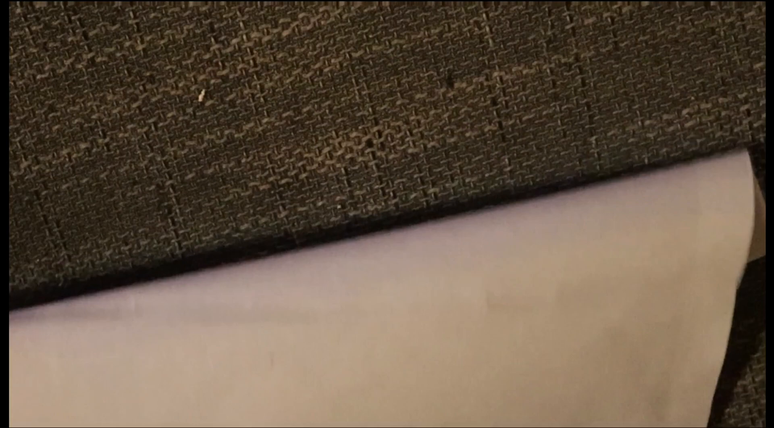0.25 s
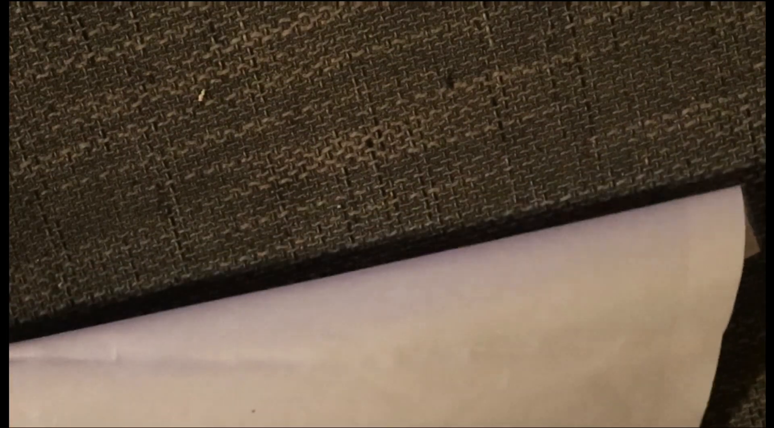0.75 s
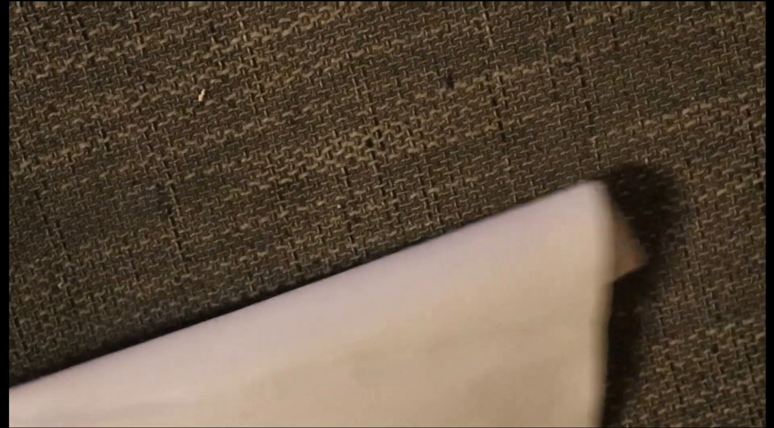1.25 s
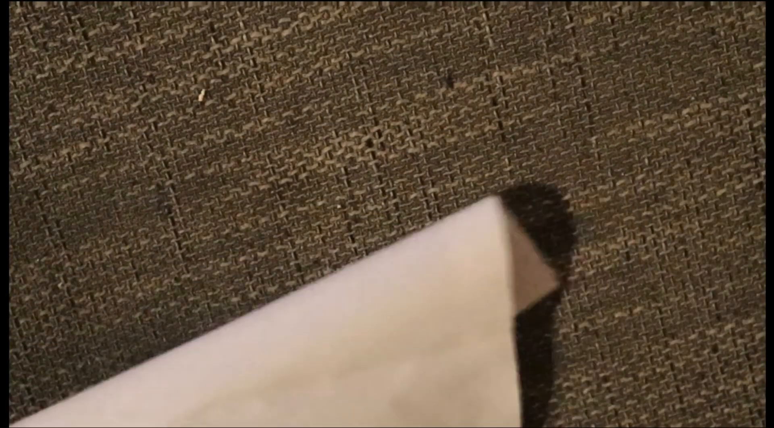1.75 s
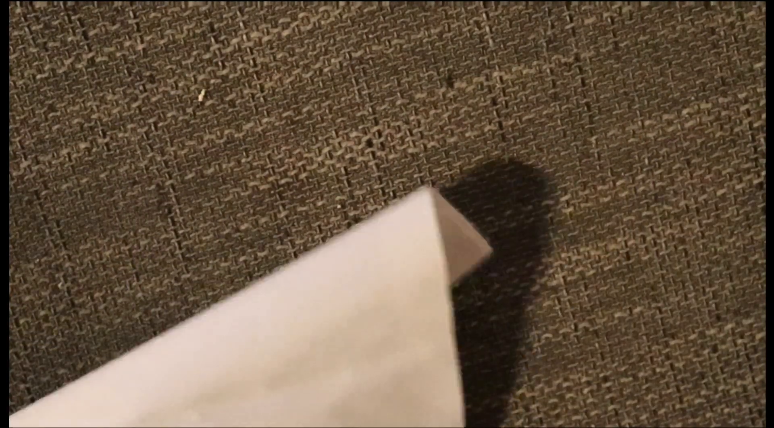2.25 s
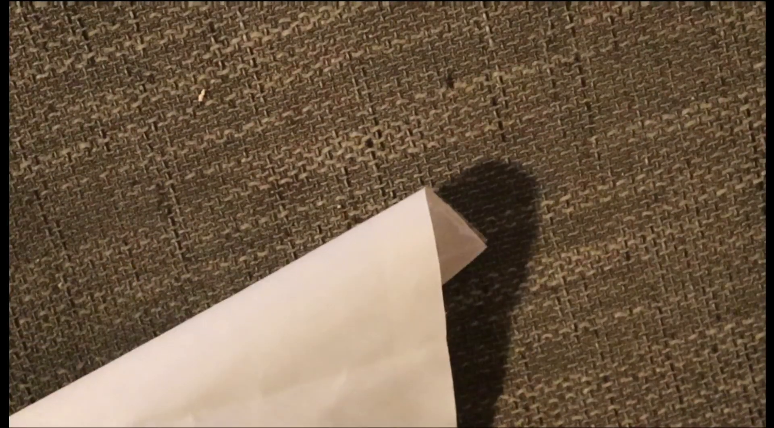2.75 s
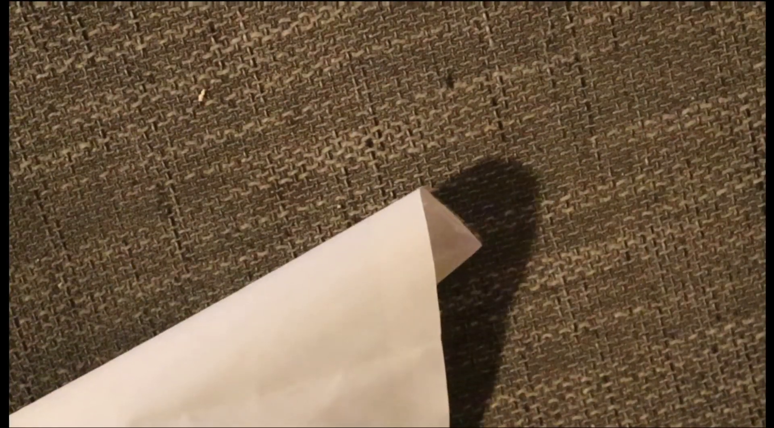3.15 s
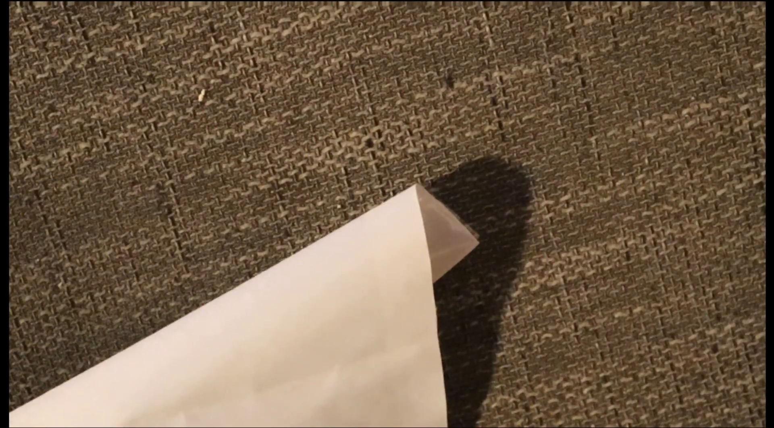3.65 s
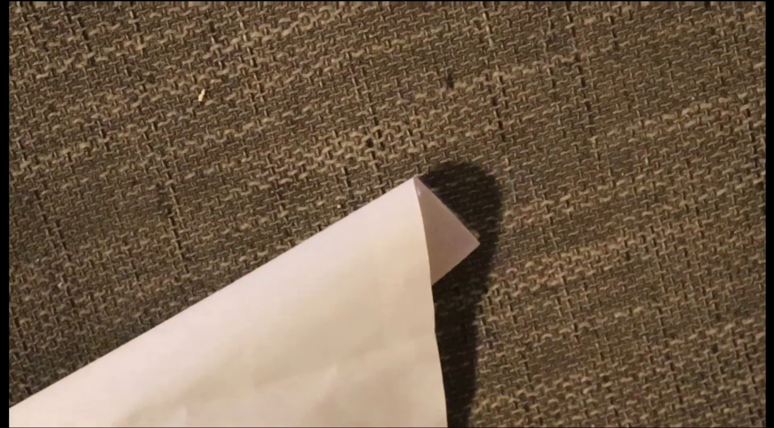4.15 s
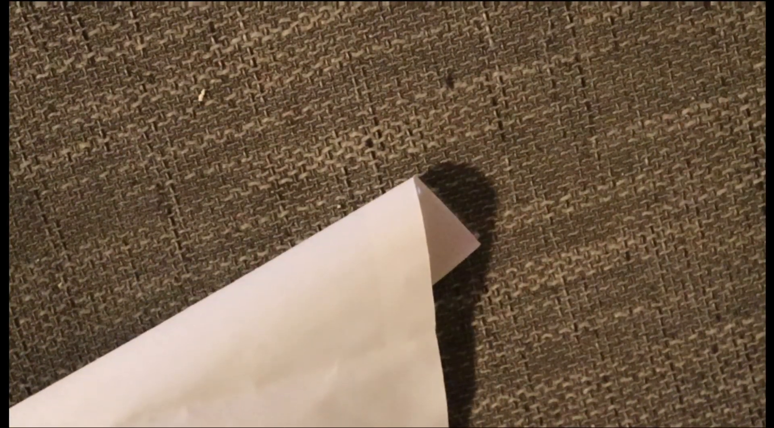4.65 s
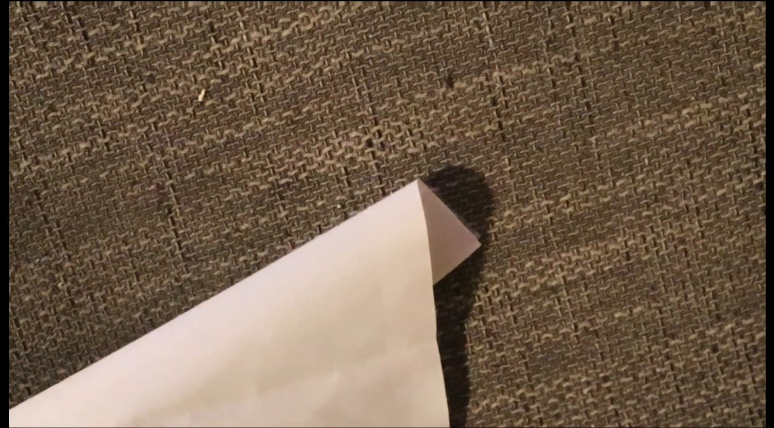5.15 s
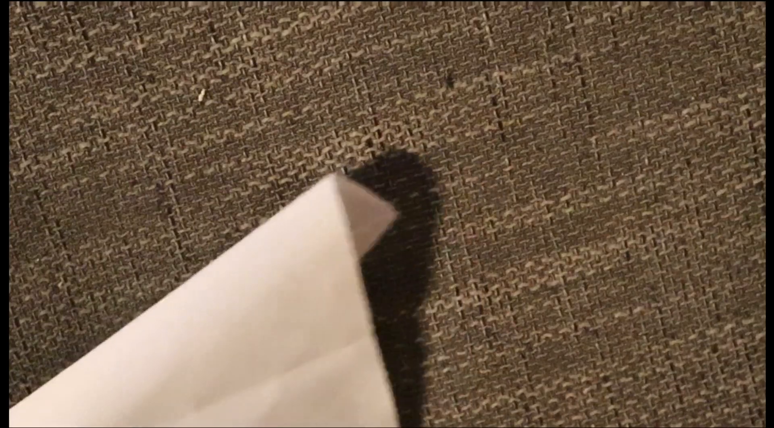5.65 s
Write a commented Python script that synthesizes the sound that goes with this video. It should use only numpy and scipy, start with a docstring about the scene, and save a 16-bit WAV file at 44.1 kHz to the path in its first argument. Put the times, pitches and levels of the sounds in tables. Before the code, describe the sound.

Hands roll up a stiff paper sheet on fabric, with close crackling, sharp crease snaps and hollow rustling.

```python
"""Hands roll up a stiff paper-like sheet on a woven mat, heard close in a quiet room.
From the start, creases snap with a bright tick and bent panels pop; a fine crackle and the hollow rustle
of the roll follow each squeeze, busy up to 2.5 s. The work thins out and nearly pauses at 3.6 s, then
resumes, with the loudest snap near 4.8 s. Throughout, the shifting sheet flaps and drags on the mat,
and a nearby surface throws each snap back."""
import sys
import numpy as np
from scipy import signal
from scipy.io import wavfile
from scipy.ndimage import uniform_filter1d

SR = 44100
rng = np.random.default_rng(int(sys.argv[2]) if len(sys.argv) > 2 else 0)


def wav_record(signal):
    """Record a signal, one row per channel, as 16-bit PCM in the file named by sys.argv[1]."""
    frames = np.transpose(np.atleast_2d(signal))
    bounded = np.clip(frames, -1, 1)
    # unit amplitude maps onto the largest positive 16-bit level
    quanta = np.round(bounded * 32767).astype(np.int16)
    wavfile.write(sys.argv[1], SR, quanta)


N = 260190

# Spectra of the layers. Each row: frequency in Hz, relative spectral density in dB.
ROOM_SPECTRUM = [(12, -29), (22, 1.5), (65, 4), (170, -7), (535, -13), (2660, -16.5), (7500, -40),
                 (9700, -49), (16000, -55)]
DRAG_SPECTRUM = [(40, -29), (80, -17.5), (135, -2.5), (210, -7), (260, -9.5), (400, -54)]
FLAP_SPECTRUM = [(120, -20), (200, -22.5), (259, 2.5), (355, -1), (600, -4), (780, -39), (1320, -120)]
RUSTLE_SPECTRUM = [(260, -14), (450, -8.5), (534, -18), (585, -4.5), (858, 1), (930, -1), (1490, -1.5),
                   (3080, -11), (5000, -17.5), (6500, -33), (11000, -120)]
CRACKLE_SPECTRUM = [(1180, -17), (2000, -1.5), (5300, -4.5), (9700, -3.5), (11200, -4.5), (13000, -19.5),
                    (16000, -27)]
TEAR_SPECTRUM = [(1500, -17), (3000, -9.5), (5000, -7.5), (7000, -3), (10000, -2.5), (12500, -8),
                 (16000, -33)]
# Sheet between shifts. Each row: time in seconds, flap level in dB, drag level in dB.
SHEET_AT_REST = [(0.0, -50, -58.5), (2.0, -57, -59), (3.4, -59.5, -59.5), (5.9, -55, -56.5)]
# Whole sheet shifting. Each row: peak time in seconds, length in seconds, flap in dB, drag in dB.
SHEET_SHIFTS = [(0.046, .3, -50, -52), (0.163, .22, -45, -43), (0.652, .06, -45, -43),
                (0.68, 0.1, -37, -38), (0.744, 0.054, -34.5, -35), (0.952, 0.38, -49, -48.5),
                (1.428, 0.069, -41.5, -52), (1.74, 0.23, -49, -48), (1.926, 0.09, -44, -41),
                (2.124, 0.65, -53.5, -60), (3.216, 0.091, -53, -51), (3.826, 0.34, -51.5, -55),
                (4.18, 0.3, -56, -73), (4.396, 0.28, -73, -65), (4.768, 0.14, -39, -56),
                (5.164, 0.14, -46, -68), (5.425, .14, -59, -49), (5.479, 0.033, -36, -58),
                (5.842, 0.2, -41.5, -46)]
# Roll held and turned. Each row: time in seconds, crackle level in dB, rustle level in dB.
ROLL_HELD = [(0.0, -40, -40.5), (0.44, -54, -49), (0.85, -44.5, -42.5), (1.25, -37, -36),
             (1.84, -47, -44.5), (2.3, -45, -45.5), (2.63, -59, -54), (2.75, -47, -47.5),
             (3.0, -47.5, -49.5), (3.37, -53, -47), (3.5, -72, -51), (3.71, -53.5, -59.5), (4.4, -76, -56),
             (4.65, -48, -50.5), (4.9, -43.5, -43), (5.13, -48, -38.5), (5.57, -48, -48), (5.9, -55, -45)]
# Fingers squeezing. Each row: peak time in seconds, length in seconds, crackle in dB, rustle in dB.
ROLL_SQUEEZES = [(0.053, 0.038, -29.5, -31.5), (0.176, 0.15, -31.5, -36), (0.355, 0.2, -40.5, -41.5),
                 (0.497, 0.15, -38, -38.5), (0.586, 0.07, -39, -39), (0.614, 0.14, -29.5, -31),
                 (0.67, 0.09, -31.5, -31), (0.735, 0.16, -28.5, -28), (0.921, 0.15, -33, -36.5),
                 (1.078, 0.11, -24.5, -28.5), (1.162, 0.17, -31.5, -36.5), (1.273, 0.083, -34, -42),
                 (1.363, 0.17, -30.5, -32), (1.422, 0.07, -29, -33.5), (1.63, 0.36, -37.5, -38),
                 (1.71, 0.072, -37, -34.5), (1.786, 0.086, -38.5, -33.5), (1.926, 0.18, -38, -46),
                 (2.104, 0.3, -41.5, -38.5), (2.184, 0.042, -37, -38), (2.248, 0.05, -51, -36),
                 (2.332, .08, -36, -42), (2.44, 0.21, -37, -42.5), (2.533, .12, -42, -36.5),
                 (2.668, 0.072, -44, -41), (2.809, 0.072, -41.5, -41.5), (3.048, 0.13, -38, -39),
                 (3.104, 0.17, -37.5, -42), (3.214, 0.072, -34.5, -35.5), (3.254, 0.14, -38, -37),
                 (3.416, 0.14, -42.5, -43.5), (3.844, 0.2, -35, -32.5), (3.938, 0.13, -38, -41),
                 (3.983, 0.16, -38.5, -35.5), (4.166, 0.2, -36.5, -36), (4.444, 0.084, -39, -48),
                 (4.51, 0.083, -38.5, -47.5), (4.619, 0.033, -44, -52), (4.772, 0.14, -27.5, -32.5),
                 (4.8, 0.05, -32, -46), (5.15, .12, -49, -43), (5.206, 0.18, -39.5, -32.5),
                 (5.463, 0.18, -36.5, -30), (5.626, 0.075, -46, -33.5), (5.746, 0.24, -43, -43),
                 (5.855, 0.051, -44, -38)]
# Panels buckling. Each row: start in seconds, peak in dB, pitch in Hz, length in milliseconds.
PANEL_POPS = [(0.0675, -25, 1010, 3.9), (0.1303, -22.5, 1740, 1.7), (0.1778, -19, 800, 1.1),
              (0.1874, -21.5, 1410, 2.3), (0.606, -13, 1600, 1.6), (0.6357, -18, 435, 4.7),
              (0.721, -18, 1490, 4.4), (0.727, -15.5, 890, 3.7), (0.7363, -21, 1250, 5.6),
              (0.972, -22.5, 1260, 3.3), (1.0695, -19.5, 824, 7.7), (1.0835, -25, 830, 3.6),
              (1.158, -24, 695, 5.5), (1.331, -22, 1510, 17), (1.3428, -17.5, 836, 8),
              (1.379, -24, 937, 2.3), (1.392, -18, 1480, 2.3), (1.4456, -26, 2530, 2.5),
              (1.5574, -20, 864, 4.2), (1.6945, -20.5, 780, 3.5), (1.7226, -17, 1120, 1.76),
              (1.981, -25.5, 1380, 1.5), (2.0871, -29, 860, 4.9), (2.1794, -26, 1130, 3.8),
              (2.2501, -25, 880, 2.7), (2.338, -24.5, 1460, 5.9), (2.527, -18, 1130, 0.79),
              (2.7467, -25, 2200, 2.6), (2.9834, -29, 1500, 3.1), (3.0296, -22, 1620, 1.9),
              (3.2077, -21.5, 1840, 3.3), (3.2377, -27, 1190, 3.4), (3.252, -24, 2270, 4),
              (3.437, -30, 1170, 2.8), (3.8332, -27, 1400, 5.8), (3.8453, -23.5, 800, 7),
              (3.967, -16, 2400, 1.4), (4.005, -30, 1220, 1.1), (4.136, -21.5, 2580, 5.8),
              (4.1671, -20, 870, 5.4), (4.1956, -22, 2400, 4.9), (4.4367, -23.5, 2270, 2.7),
              (4.7788, -19, 1850, 3.8), (4.8371, -24, 800, 5.1), (5.0308, -24, 880, 4.6),
              (5.0454, -24.5, 1540, 5), (5.0888, -20, 1070, 2.5), (5.0954, -18.5, 1530, 2),
              (5.129, -16.5, 1140, 3.1), (5.1324, -23.5, 390, 5), (5.1648, -22, 1590, 1.8),
              (5.206, -25.5, 796, 2.5), (5.2245, -17, 1490, 2.5), (5.274, -23, 2100, 1.4),
              (5.3617, -22.5, 2160, 1.5), (5.464, -21, 1280, 1.8), (5.485, -25, 1460, 10),
              (5.692, -29, 1560, 4), (5.8435, -18.5, 690, 2.9), (5.85, -22, 684, 5.3),
              (5.8825, -25, 355, 5.2)]
# Creases giving way. Each row: start in seconds, peak in dB, bright band in Hz, length in milliseconds.
CREASE_SNAPS = [(0.0482, -19, 9800, 0.51), (0.1571, -21, 5960, 0.71), (0.1898, -14, 6100, 0.8),
                (0.2285, -23.5, 9310, 4.4), (0.3176, -30, 9470, 2.4), (0.3328, -19, 9400, 2.4),
                (0.3566, -13, 10000, 0.36), (0.3657, -23, 3600, 1.8), (0.4845, -22, 9300, 0.68),
                (0.5113, -19, 3700, 1.9), (0.5694, -19, 9520, 3.2), (0.6067, -13, 10400, 1.9),
                (0.6093, -16, 10200, 3.2), (0.6558, -21, 9140, 1.8), (0.6906, -18, 6440, 1.2),
                (0.7265, -18, 5750, 6.4), (0.762, -15, 9600, 1.1), (0.88, -17, 6140, 1.9),
                (0.9275, -21, 6420, 2), (0.9553, -27, 5910, 1.6), (1.0456, -21, 7530, 1.0),
                (1.07, -10.5, 7500, 1.1), (1.095, -11, 8970, 1.3), (1.0988, -19, 4330, 1.0),
                (1.1551, -15, 6310, 1.9), (1.2294, -17, 4640, 1), (1.2473, -14, 6770, 1.2),
                (1.3326, -13.5, 9700, 1.9), (1.3458, -12, 8500, 1.9), (1.373, -13, 8140, 1.3),
                (1.4478, -13, 3630, 0.56), (1.5197, -15, 10200, 0.64), (1.5546, -13, 9770, 0.63),
                (1.558, -14.5, 6450, 1.4), (1.629, -23, 8200, 1.5), (1.6627, -11.5, 9470, 0.58),
                (1.706, -18.5, 9750, 1.8), (1.7903, -17, 10700, 0.57), (1.8209, -17.5, 4870, 0.78),
                (1.9082, -17, 9900, 1.1), (1.9302, -20, 10500, 0.8), (1.9742, -18, 9630, 1.2),
                (2.0644, -17, 10400, 0.9), (2.069, -18, 10900, 0.84), (2.0793, -19, 7200, 1),
                (2.1136, -16, 11000, 0.99), (2.1163, -17, 10000, 1.8), (2.1225, -23, 10300, 1.1),
                (2.1356, -17, 9980, 0.91), (2.1802, -21, 6860, 3), (2.1923, -13, 10400, 0.45),
                (2.221, -17, 8800, 1.1), (2.2383, -30, 9680, 0.83), (2.2507, -8.5, 9200, 1.2),
                (2.3064, -18.5, 10400, 1.7), (2.3134, -22, 8850, 0.99), (2.3339, -19, 9170, 1.3),
                (2.3382, -18, 6400, 1.3), (2.415, -13, 8100, 3), (2.445, -15, 6750, 0.83),
                (2.5054, -23, 10100, 1.1), (2.5323, -12, 10000, 1.5), (2.5537, -21, 9000, 1.1),
                (2.661, -20.5, 9300, 0.5), (2.725, -18, 11300, 1.1), (2.747, -23, 3740, 1.1),
                (2.802, -29, 6960, 1.1), (2.876, -19, 3730, 1.45), (2.918, -24, 10600, 1.2),
                (2.9513, -19.5, 9300, 1.6), (2.984, -9, 10100, 1.33), (3.03, -10.5, 9600, 1.2),
                (3.0748, -23, 9450, 1.4), (3.133, -23, 5600, 2.8), (3.2085, -18.5, 6700, 3.9),
                (3.2653, -19.5, 3930, 3.9), (3.3766, -25.5, 8600, 1.4), (3.4836, -24, 10100, 1.3),
                (3.5325, -38, 6200, 1.1), (3.5498, -27.5, 4430, 1.4), (3.628, -44, 8600, 1.2),
                (3.8446, -21, 10700, 2.4), (3.8528, -19, 8150, 1.1), (3.9035, -17, 8140, 1.3),
                (3.9089, -18, 6840, 2.5), (3.9668, -12.5, 6660, 0.68), (4.01, -14, 9100, 2.2),
                (4.0276, -20.5, 5600, 0.99), (4.1176, -15.5, 9500, 1.35), (4.1353, -17, 9350, 2.4),
                (4.145, -23, 9720, 0.68), (4.1606, -17, 8650, 2.9), (4.195, -19, 9400, 3.1),
                (4.2083, -13, 9390, 0.73), (4.2296, -15.5, 8500, 4.2), (4.438, -16.5, 9600, 3.2),
                (4.4443, -16, 9500, 3.2), (4.5068, -19.5, 10200, 2.6), (4.536, -25.5, 8840, 1.7),
                (4.5495, -24, 10000, 1.8), (4.5828, -14.5, 8500, 1.1), (4.6255, -17.5, 10000, 1.2),
                (4.6149, -25, 10200, 0.68), (4.6956, -19, 10200, 2.1), (4.7244, -12, 10300, 1.1),
                (4.7328, -11, 9990, 1.1), (4.7394, -21, 9020, 1.8), (4.771, -13.5, 6630, 3.9),
                (4.7767, -5.5, 9300, 1), (4.8108, -10, 5700, 2.3), (4.8656, -14, 6740, 0.43),
                (4.9357, -19, 7940, 1.3), (4.9582, -20.5, 9980, 1.0), (4.9852, -23, 4470, 3.6),
                (5.0084, -23, 10800, 0.93), (5.047, -20, 11300, 1.1), (5.1063, -19, 6240, 1.1),
                (5.14, -23, 10900, 0.78), (5.199, -13, 10000, 0.84), (5.2255, -14, 8850, 0.66),
                (5.2737, -23, 9400, 0.72), (5.3209, -35, 3390, 1.0), (5.3454, -23.5, 4200, 0.72),
                (5.3609, -22, 10800, 0.77), (5.3721, -12, 10800, 0.4), (5.4285, -20.5, 8200, 0.59),
                (5.4625, -33, 6000, 1.3), (5.4857, -19, 3450, 1.9), (5.63, -29, 9800, 4.3),
                (5.6969, -22, 10000, 0.44), (5.7546, -23, 9800, 1), (5.785, -14.5, 10900, 0.78),
                (5.838, -20.5, 11000, 0.96), (5.8484, -19, 11100, 0.46)]


def gain_of(db):
    """Decibels to amplitude factor."""
    return 10 ** (np.asarray(db) / 20)


def unit_rms(x):
    """Scale to rms 1."""
    return x / np.sqrt(np.mean(x ** 2) + 1e-20)


def add(mix, start_s, sound):
    """Mix a sound in, in place."""
    part = mix[round(start_s * SR):][:len(sound)]
    part += sound[:len(part)]


def coloured(x, spectrum, size=4096):
    """Minimum-phase filter, so attacks stay sharp; output rms 1."""
    hz, db = np.transpose(spectrum)
    bins_hz = abs(np.fft.fftfreq(size, 1 / SR))
    log_gain = np.log(gain_of(np.interp(np.log(bins_hz + 1), np.log(hz + 1), db, -100, -100)))
    taps = np.fft.ifft(np.exp(np.conj(signal.hilbert(log_gain)))).real[:size // 2]
    return unit_rms(signal.oaconvolve(x, taps)[:len(x)])


def ring(x, hz, width_hz):
    """One resonance."""
    return signal.lfilter(*signal.iirpeak(min(hz, SR / 2.2), hz / width_hz, SR), x)


def burst(t, length_ms, rise, fall):
    """Envelope; rise and fall are time constants in shares of the length."""
    return (1 - np.exp(-t * 1000 / (rise * length_ms))) * np.exp(-t * 1000 / (fall * length_ms))


def grains(per_s, spread_db, burst_s, clump_db, shapes=16):
    """Tiny noise bursts of unequal size, swelling in clumps; rms 1."""
    clumps = unit_rms(uniform_filter1d(uniform_filter1d(rng.standard_normal(N), 600), 600))
    impulses = gain_of(spread_db * np.minimum(rng.exponential(1, N), 3) + clump_db * clumps)
    impulses *= rng.random(N) < per_s / SR
    shape = rng.integers(0, shapes, N)
    out, t = np.zeros(N), np.arange(400) / SR
    for k in range(shapes):
        grain = unit_rms(rng.standard_normal(len(t)) * np.exp(-t / (burst_s * rng.uniform(0.39, 1.96))))
        out += signal.oaconvolve(impulses * (shape == k), grain)[:N]
    return unit_rms(out)


def layer_gain(baseline, moves, layer, rise_share=0.41, swell_db=15.5):
    """Baseline plus a swell per movement; layer picks the first (0) or second (1) dB column."""
    t = np.arange(0, N + 64, 64) / SR
    times_s, *baseline_db = np.transpose(baseline)
    power = gain_of(2 * np.interp(t, times_s, baseline_db[layer]))
    for peak_s, length_s, *peak_db in moves:
        distance = np.maximum((peak_s - t) / rise_share, (t - peak_s) / (1 - rise_share)) / length_s
        power += gain_of(2 * (peak_db[layer] - swell_db * distance))
    return np.interp(np.arange(N) / SR, t, np.sqrt(power))


def room_tone(level_db=-57):
    """Low rumble and faint hiss."""
    return gain_of(level_db) * coloured(rng.standard_normal(N), ROOM_SPECTRUM, size=16384)


def with_reflections(x, echo_s=0.0072, echo_db=-25.5, tail_db=-12.5, t60_s=0.13, size=4096):
    """Echo off the nearest hard surface, and a soft room tail that varies as hands and sheet move."""
    out, t = x.copy(), np.arange(size) / SR
    add(out, echo_s, gain_of(echo_db) * x)
    fade = gain_of(-60 * t / t60_s) * (1 - np.exp(-t / 0.0024))
    window = np.sin(np.pi * np.arange(size) / size)  # even power at half overlap
    for start in range(0, N - size // 2, size // 2):
        piece = x[start:start + size]
        tail = fade * rng.standard_normal(size)
        tail *= gain_of(tail_db) / np.linalg.norm(tail)
        add(out, start / SR, signal.fftconvolve(piece * window[:len(piece)], tail))
    return out


def mat_drag():
    """Roll and hands shift on the mat: a low rumble."""
    rumble = coloured(rng.standard_normal(N), DRAG_SPECTRUM, size=16384)
    return layer_gain(SHEET_AT_REST, SHEET_SHIFTS, layer=1) * rumble


def sheet_flap():
    """The whole sheet pushes air in soft low lumps."""
    lumps = grains(per_s=300, spread_db=2.5, burst_s=0.001, clump_db=3.0)
    lumps += 0.59 * rng.standard_normal(N)
    return layer_gain(SHEET_AT_REST, SHEET_SHIFTS, layer=0) * coloured(lumps, FLAP_SPECTRUM)


def roll_rustle():
    """Dull knocks sound through the hollow of the roll."""
    knocks = grains(per_s=1200, spread_db=3.5, burst_s=0.0011, clump_db=2.83)
    knocks += 0.43 * rng.standard_normal(N)
    return layer_gain(ROLL_HELD, ROLL_SQUEEZES, layer=1) * coloured(knocks, RUSTLE_SPECTRUM)


def fibre_crackle(crossover_db=-33.5):
    """Fibres and small creases tick; a harder squeeze crowds the ticks into a finer scrunch."""
    effort = layer_gain(ROLL_HELD, ROLL_SQUEEZES, layer=0)
    dense_share = effort / (effort + gain_of(crossover_db))
    sparse = grains(per_s=800, spread_db=5.0, burst_s=0.00099, clump_db=5.0)
    sparse += 0.36 * rng.standard_normal(N)  # hiss of sliding on the weave
    dense = grains(per_s=4000, spread_db=4.0, burst_s=0.00096, clump_db=2.5)
    ticks = np.sqrt(1 - dense_share) * sparse + 0.89 * np.sqrt(dense_share) * dense
    return effort * coloured(ticks, CRACKLE_SPECTRUM)


def panel_pops():
    """A panel flips over: a few swings at its pitch, roughened by the fibres."""
    out, t = np.zeros(N), np.arange(1500) / SR
    for start_s, peak_db, hz, length_ms in PANEL_POPS:
        noise = rng.standard_normal(len(t))
        swing = np.sin(2 * np.pi * hz * t + 2 * noise[0])
        roughness = unit_rms(ring(ring(noise, 1.41 * hz, width_hz=2500), hz, width_hz=4000))
        pop = (swing + 0.45 * roughness) * burst(t, length_ms, rise=0.13, fall=0.46)
        add(out, start_s, gain_of(peak_db) * pop / abs(pop).max())
    return out


def small_snap_rows(count=110, over_crackle_db=21, ceiling_db=-19):
    """Lesser creases give way at random times, mostly bright and short; rows as in CREASE_SNAPS."""
    when, weakness, dullness, slowness = rng.random((count, 4)).T
    effort = layer_gain(ROLL_HELD, ROLL_SQUEEZES, layer=0)
    crackle_db = 20 * np.log10(effort[(when * N).astype(int)])
    peak_db = np.minimum(crackle_db + over_crackle_db - 9.7 * weakness, ceiling_db)
    band_hz = 10800 - 7000 * dullness ** 2
    length_ms = 0.89 + 3.3 * slowness ** 2
    return list(zip(when * N / SR, peak_db, band_hz, length_ms))


def crease_snaps(knock_db=-10):
    """A crease tears along: a broad burst, one brighter band and a knock through the hollow roll."""
    out, t = np.zeros(N), np.arange(500) / SR
    for start_s, peak_db, band_hz, length_ms in CREASE_SNAPS + small_snap_rows():
        noise = rng.standard_normal(len(t))
        tear = coloured(noise * burst(t, length_ms, rise=0.63, fall=0.39), TEAR_SPECTRUM, size=512)
        band = unit_rms(ring(tear, band_hz, width_hz=1100))
        knock = coloured(noise * burst(t, length_ms, rise=0.3, fall=0.76), RUSTLE_SPECTRUM, size=1024)
        snap = 1.16 * tear + band + gain_of(knock_db) * knock
        add(out, start_s, gain_of(peak_db) * snap / abs(snap).max())
    return out


def scene():
    """The sheet in its room, mono."""
    sheet = fibre_crackle() + roll_rustle() + sheet_flap() + crease_snaps() + panel_pops()
    return (with_reflections(sheet) + mat_drag() + room_tone())[None]


def record(dry):
    """Steep low-pass."""
    cutoff_hz = 15850
    taps = signal.firwin(511, cutoff_hz, window=("kaiser", 9), fs=SR)
    return signal.oaconvolve(dry, taps[None], "same")


dry = scene()
out = record(dry)
wav_record(out)
```